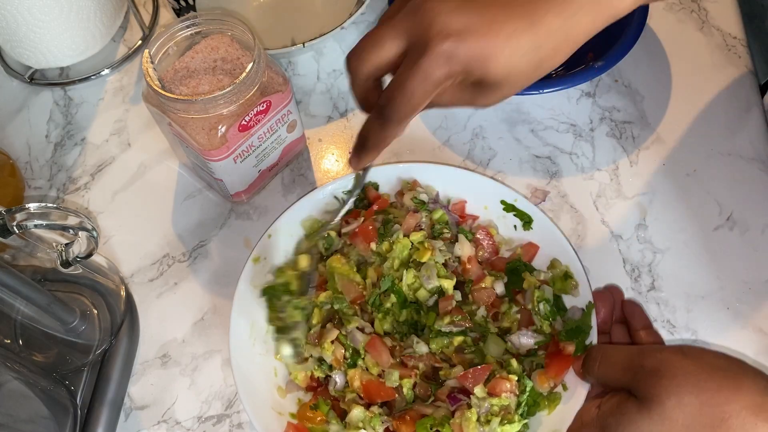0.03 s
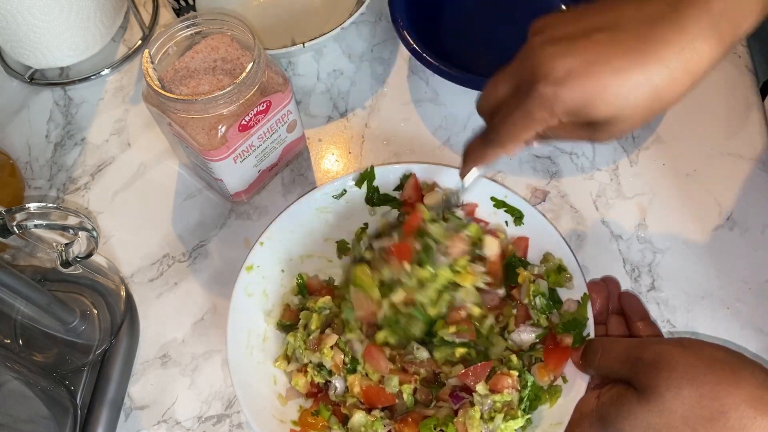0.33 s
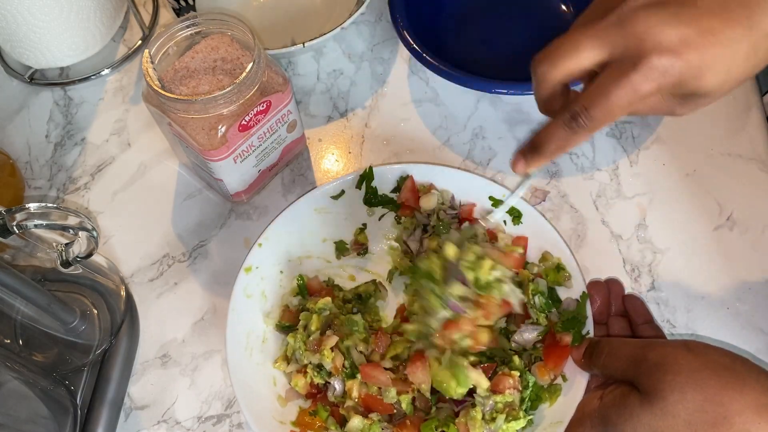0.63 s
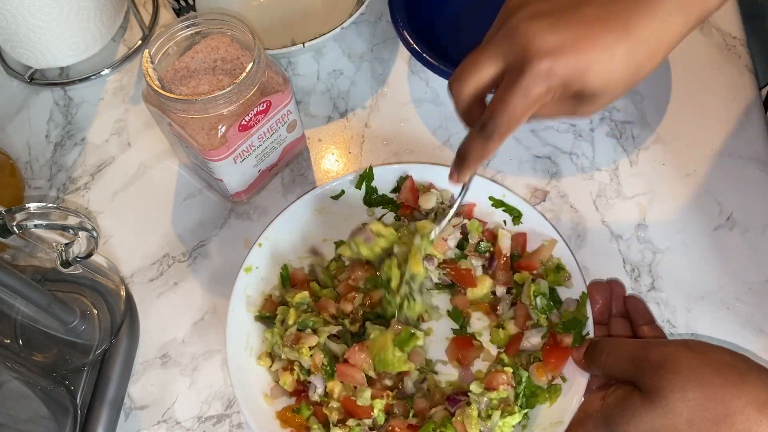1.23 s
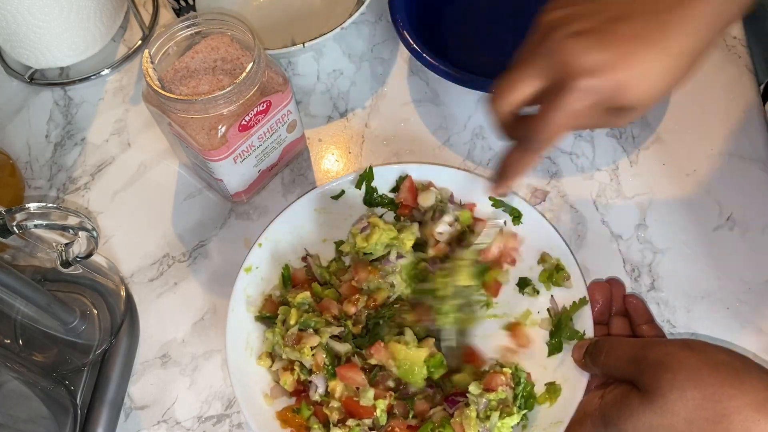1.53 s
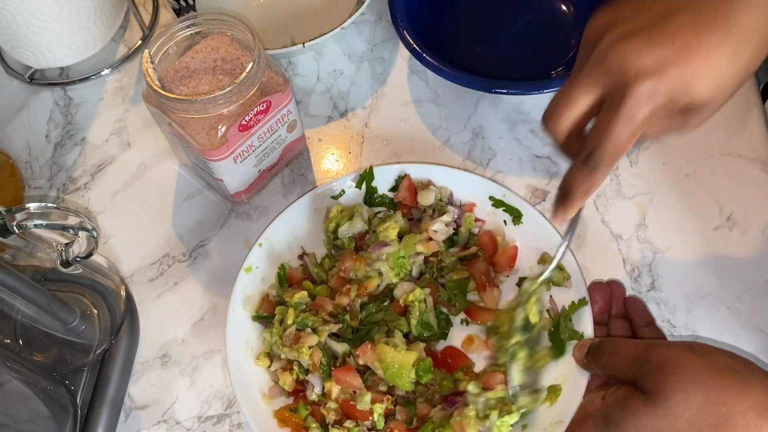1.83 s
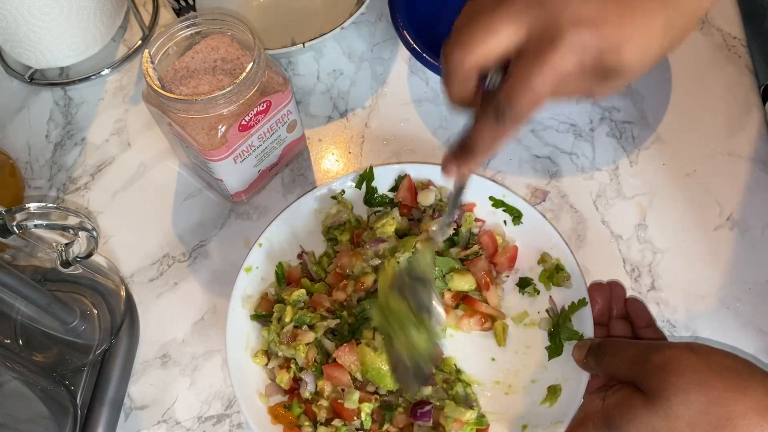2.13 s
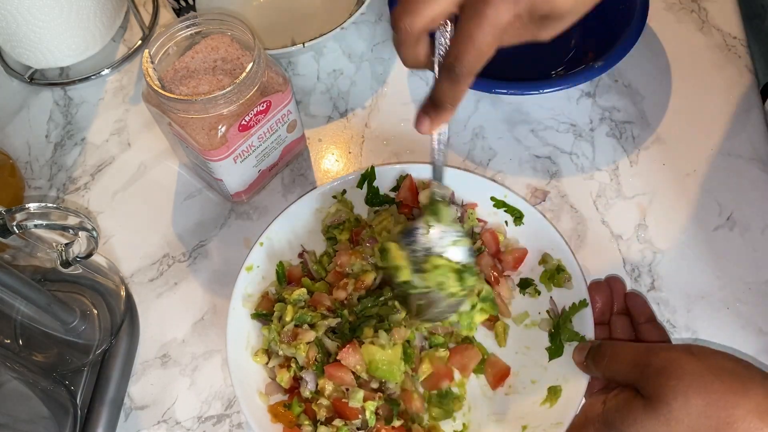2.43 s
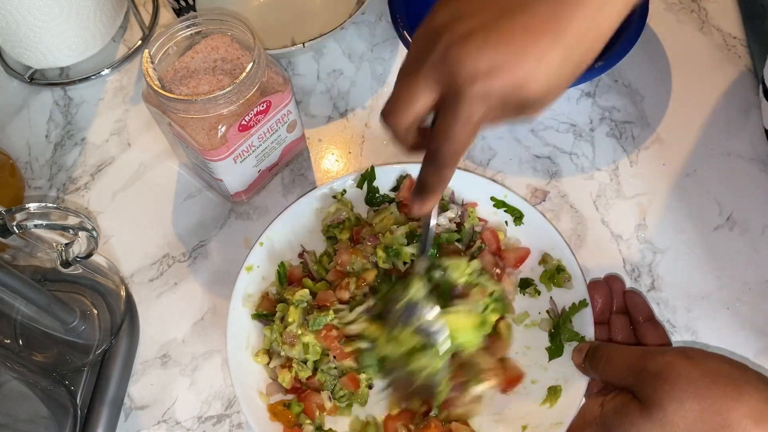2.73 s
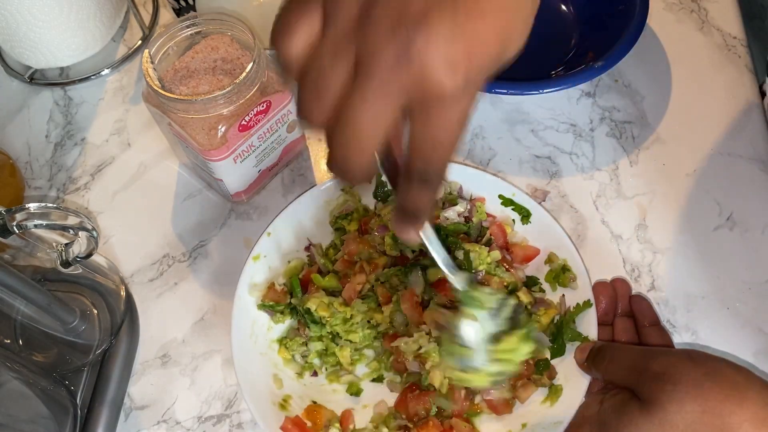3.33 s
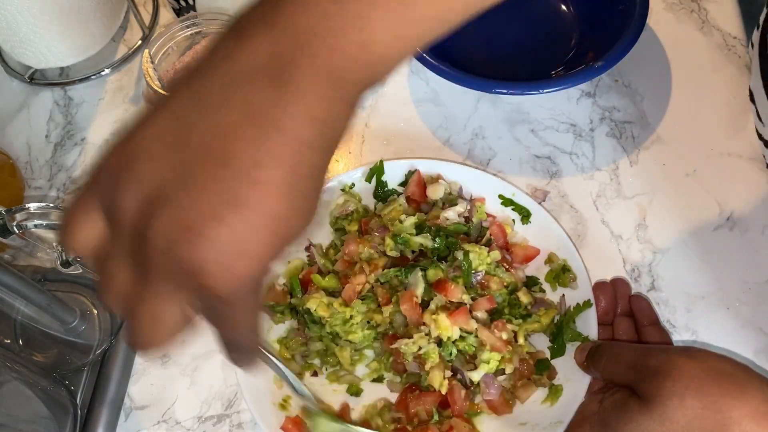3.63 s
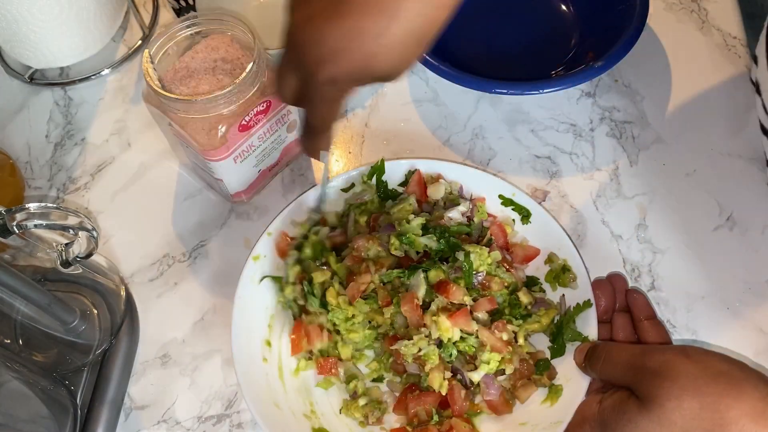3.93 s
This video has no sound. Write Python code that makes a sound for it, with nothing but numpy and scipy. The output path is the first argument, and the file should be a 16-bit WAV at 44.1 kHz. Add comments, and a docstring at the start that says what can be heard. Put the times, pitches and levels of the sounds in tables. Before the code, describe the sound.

In a quiet kitchen, a spoon gives small, damped clicks on a plate while mixing softly rustling salad. The plate bumps dully on the counter twice, over steady low room rumble and faint microphone hiss.

```python
"""A very quiet kitchen, where a spoon turns chopped salad on a plate.
The leaves give a soft rustle, a moist crackle and one hollow slide. Spoon contacts ring as tiny ticks,
damped by the food, and the plate bumps dully on the counter twice. Underneath sits a bed of low room
rumble, mains hum and air; the recorder adds its own hiss and a thin electrical whine."""
import sys
import numpy as np
from scipy import signal
from scipy.fft import rfft, irfft
from scipy.io import wavfile
from scipy.ndimage import uniform_filter1d

SR = 44100
rng = np.random.default_rng(int(sys.argv[2]) if len(sys.argv) > 2 else 0)


def persist_wave(psi):
    """Save psi, clipped to +-1, as 16-bit WAV."""
    counts = np.round(np.clip(psi, -1, 1) * 32767).astype(np.int16)
    wavfile.write(sys.argv[1], SR, np.atleast_2d(counts).T)


N = 176400
TIME = np.arange(N) / SR

# colour of the room rumble (f/Hz, relative level/dB)
RUMBLE_EQ = [(2, 6), (10, 6), (17, -8), (26, -5), (36, -14), (45, -16), (60, -23), (78, -24.5), (95, -31.5),
             (130, -41), (300, -64)]
# colour of the room air and recorder hiss (f/Hz, relative level/dB)
HISS_EQ = [(30, -8), (120, 2.5), (280, -2), (420, -3), (800, -7.5), (1300, -9), (2000, -10.5), (3500, -13),
           (7000, -15), (11000, -16.5), (15500, -18.5)]
# mains and appliance hum (f/Hz, level/dB)
HUM_TONES = [(100, -70), (120, -90.5)]
# pitch of the electrical whine (t/s, f/Hz)
WHINE_PITCH = [(0, 999.2), (.38, 999.2), (.44, 1000.7), (2.25, 1000.7), (2.32, 999.2), (4, 999.2)]
# fader ride on the whine (t/s, level/dB)
WHINE_FADER = [(0, -81.5), (.35, -83), (.5, -82.5), (2.2, -83), (2.35, -80), (4, -79.5)]
# balance of the whine's harmonics (f/Hz, relative level/dB)
WHINE_EQ = [(1000, 1), (2000, -0.6), (4000, -3), (8000, -5.2), (9000, -7.5), (10000, -8.5), (14000, -14.5),
            (15000, -22)]
# swells of the turned salad (t/s, level/dB)
RUSTLE_FADER = [(0, -74), (.12, -83.5), (.3, -70), (.55, -78), (.7, -71.5), (.87, -70.5), (1.05, -79.5),
                (1.3, -76), (1.47, -74), (1.58, -71), (1.95, -78.5), (2.1, -68.5), (2.45, -76),
                (2.7, -72.5), (3.0, -76), (3.17, -73.5), (3.5, -87), (3.77, -71.5), (4, -80)]
# muffled colour of the rustle (f/Hz, relative level/dB)
RUSTLE_EQ = [(60, -19.5), (150, -1.5), (230, 2), (310, 1), (420, -8), (600, -9.5), (850, -15),
             (2000, -22.5), (8000, -35.5)]
# the spoon's push through the leaves (t/s, length/s, level/dB)
SLIDE_CUES = [(0.17, 0.78, -69)]
# hollow colour of that push (f/Hz, relative level/dB)
SLIDE_EQ = [(150, -18), (240, 1.5), (305, 7), (430, -7), (590, -1.5), (820, -24), (1250, -20.5), (1850, -7),
            (2500, -17), (4000, -25.5), (12000, -49)]
# bumps of the plate on the counter (t/s, length/s, level/dB, f/Hz)
BUMP_CUES = [(0.285, 0.078, -44.5, 52.2), (2.064, 0.12, -45, 50.3)]
# spoon contacts; a harder touch reaches higher (t/s, peak level/dB, low f/Hz, high f/Hz)
TICK_CUES = [(0.3115, -51, 1500, 3000), (.3496, -45.5, 1450, 2930), (0.5014, -33.5, 4140, 7900),
             (.676, -53.5, 300, 1300), (1.093, -65, 1400, 4500), (1.5619, -55, 900, 4500),
             (2.1725, -56, 900, 2400), (3.468, -57, 350, 1400), (3.709, -41.5, 3700, 9000),
             (3.7232, -45.5, 2360, 3660), (3.7395, -58, 2000, 3600), (3.744, -49.5, 400, 3000),
             (3.7747, -45, 855, 3580)]
# ring of spoon and plate, damped by the food (f/Hz, relative level/dB, t60/s)
RING_MODES = [(556, -8, 0.024), (1200, -36, 0.0023), (1740, -9.5, 0.0032), (2900, -23, 0.017),
              (3865, 0.5, 0.003), (4950, -10.5, .008), (6580, -3, 0.0021), (7540, -20, 0.0095),
              (11000, -8, .006)]


def amp(db):
    """Decibels to gain."""
    return 10 ** (np.asarray(db) / 20)


def unit(x):
    """Scales to an rms of 1."""
    return x / np.sqrt(np.mean(x ** 2) + 1e-30)


def at_hz(eq, hz):
    """Reads an EQ curve in dB on a log-frequency axis."""
    f, db = np.transpose(eq)
    return np.interp(np.log(hz + 0.0011), np.log(f), db)


def curve(points):
    """Reads an automation curve at every sample."""
    return np.interp(TIME, *np.transpose(points))


def add(mix, start, sound):
    """Drops a sound into the mix at a start time in seconds."""
    part = mix[round(start * SR):][:len(sound)]
    part += sound[:len(part)]


def noise(eq):
    """Steady noise of the given colour, rms 1."""
    hz = np.fft.rfftfreq(N, 1 / SR)
    white = rfft(rng.standard_normal(N))
    return unit(irfft(white * amp(at_hz(eq, hz)) * (hz > 0), N))


def tone(cycles):
    """A sine that follows a running cycle count from a random phase, rms 1."""
    return unit(np.sin(2 * np.pi * (cycles + rng.random())))


def room_tone(rumble_db=-43.5, hiss_db=-67.5):
    """The bed: deep rumble, steady mains hum and an even hiss of air and recorder."""
    hum = sum(amp(db) * tone(hz * TIME) for hz, db in HUM_TONES)
    return amp(rumble_db) * noise(RUMBLE_EQ) + hum + amp(hiss_db) * noise(HISS_EQ)


def recorder_whine(jitter_hz=0.4):
    """A thin stack of electrical harmonics whose pitch steps slightly up and back."""
    jitter = jitter_hz * unit(uniform_filter1d(rng.standard_normal(N), size=2000))
    cycles = np.cumsum(curve(WHINE_PITCH) + jitter) / SR
    base_hz = WHINE_PITCH[0][1]
    stack = sum(amp(at_hz(WHINE_EQ, k * base_hz)) * tone(k * cycles) for k in range(1, 16))
    return amp(curve(WHINE_FADER)) * stack


def salad_rustle():
    """A muffled rustle swells and sinks as the salad is turned."""
    return amp(curve(RUSTLE_FADER)) * noise(RUSTLE_EQ)


def moist_crackle(pops_per_s=35, level_db=-82.5, spread_db=3, band_hz=(1500, 13000)):
    """Moist pieces part in sparse, bright pops of uneven strength."""
    triggers = rng.random(N) < pops_per_s / SR
    accents_db = spread_db * np.minimum(rng.exponential(1, N), 3)
    band = signal.butter(2, band_hz, "band", fs=SR, output="sos")
    return amp(level_db) * unit(signal.sosfilt(band, triggers * amp(accents_db)))


def spoon_slide(fade_s=0.076):
    """The spoon pushes through the leaves: a longer, hollow rustle that fades in and out."""
    envelope = np.zeros(N)
    for start, length, db in SLIDE_CUES:
        t = np.arange(0, length, 1 / SR)
        fades = np.minimum(np.minimum(t, length - t) / fade_s, 1)
        add(envelope, start, amp(db) * fades)
    return envelope * noise(SLIDE_EQ)


def plate_bumps():
    """The pushed plate bumps the counter, each time with a few soft, deep cycles."""
    out = np.zeros(N)
    for start, length, db, hz in BUMP_CUES:
        t = np.arange(0, length, 1 / SR)
        swell = np.sin(np.pi * t / length)
        add(out, start, amp(db) * swell * np.sin(2 * np.pi * hz * t))
    return out


def spoon_ticks(click_db=3, snap_db=-16.5):
    """Each contact, hard or soft, rings the damped spoon and plate for a few milliseconds."""
    t = np.arange(1024) / SR
    ring = sum(amp(db - 60 * t / t60) * np.cos(2 * np.pi * hz * t) for hz, db, t60 in RING_MODES)
    ring[0] += amp(click_db)  # bare click on the attack
    snap = amp(snap_db) * ring  # wide-band layer beside each contact's own band
    out = np.zeros(N)
    for start, peak_db, low_hz, high_hz in TICK_CUES:
        band = signal.butter(2, [low_hz, high_hz], "band", fs=SR, output="sos")
        tick = signal.sosfilt(band, ring) + snap
        add(out, start, amp(peak_db) * tick / abs(tick).max())
    return out


def scene():
    """Salad, plate and spoon over the room tone, in mono."""
    salad = moist_crackle() + salad_rustle() + spoon_slide()
    return (salad + plate_bumps() + spoon_ticks() + room_tone())[None]


def record(dry):
    """The recorder adds its whine, then cuts the very top of the treble."""
    low_pass = signal.firwin(801, cutoff=15750, window=("kaiser", 9), fs=SR)
    return signal.oaconvolve(dry + recorder_whine(), low_pass[None], "same")


dry = scene()
out = record(dry)
persist_wave(out)
```